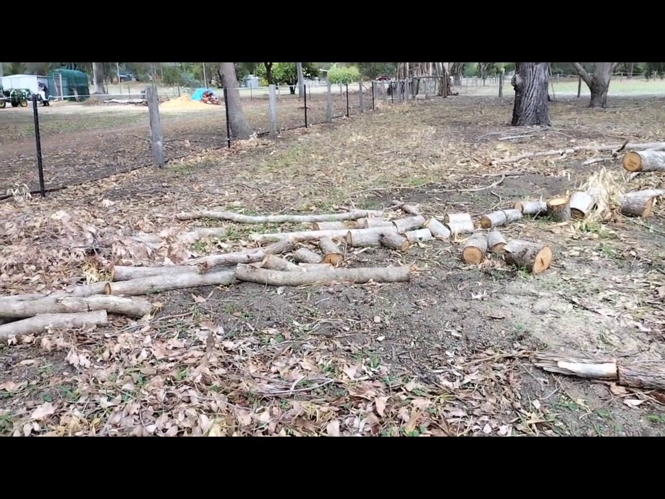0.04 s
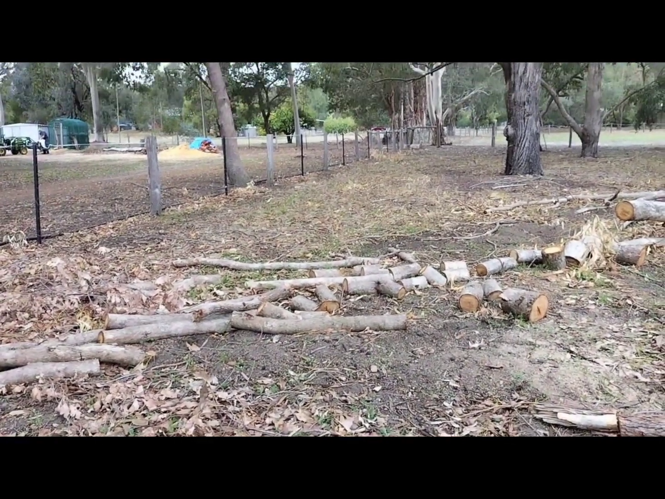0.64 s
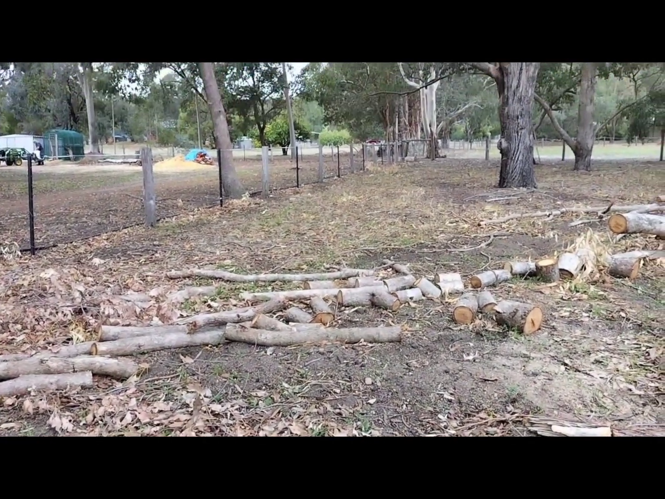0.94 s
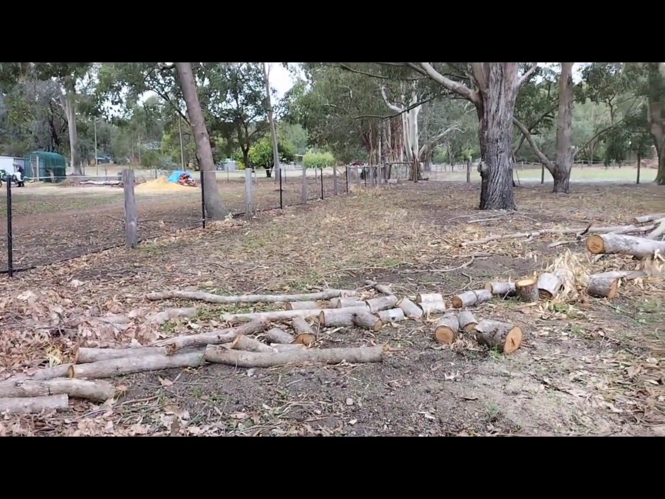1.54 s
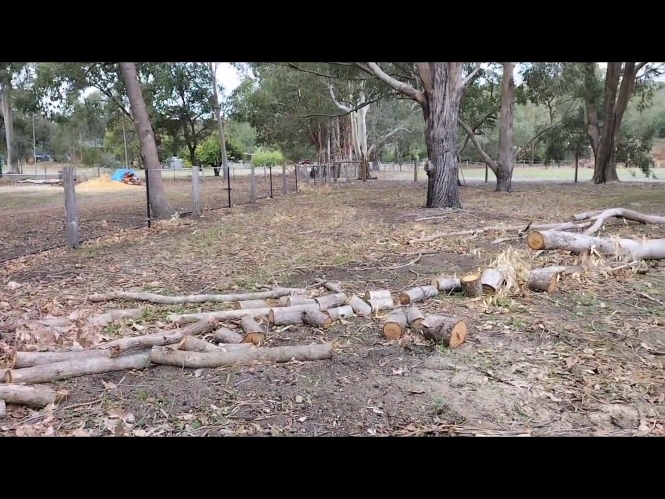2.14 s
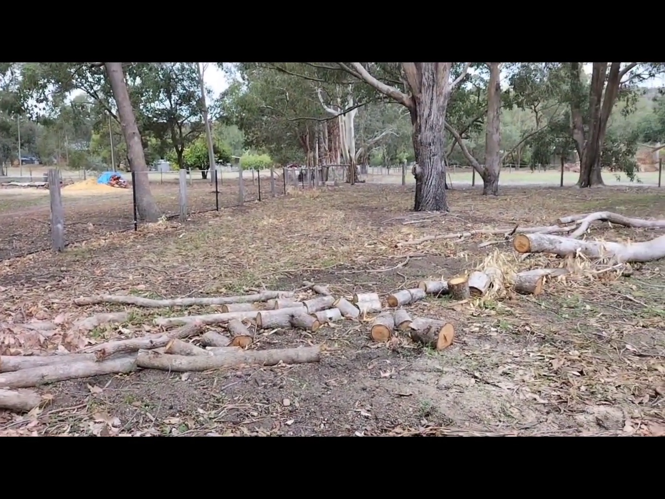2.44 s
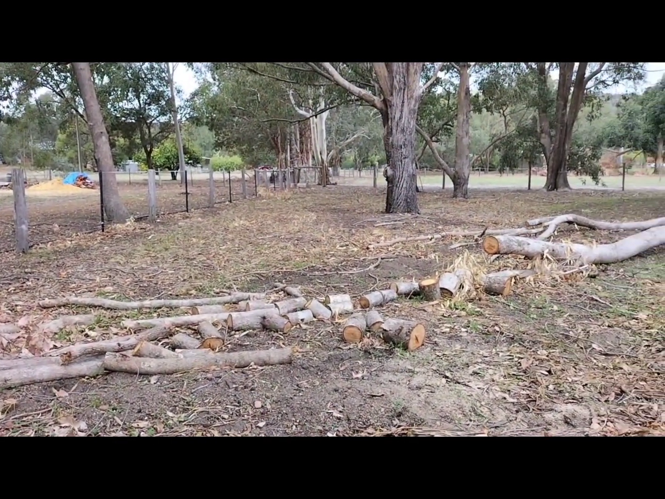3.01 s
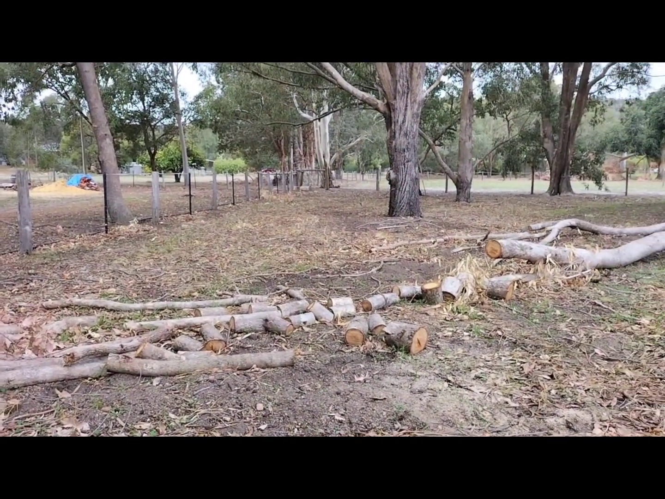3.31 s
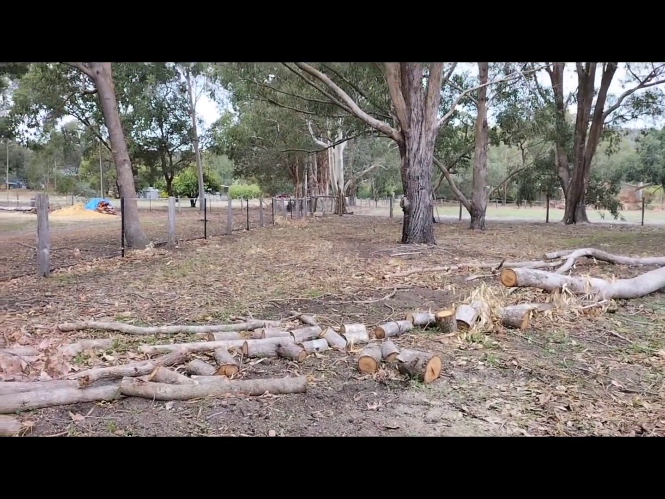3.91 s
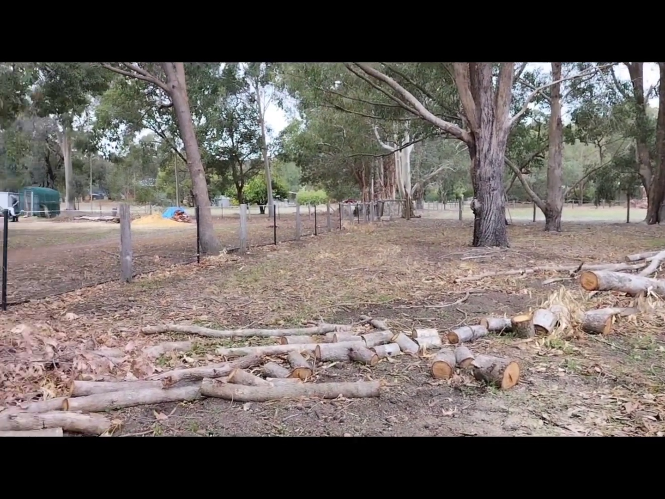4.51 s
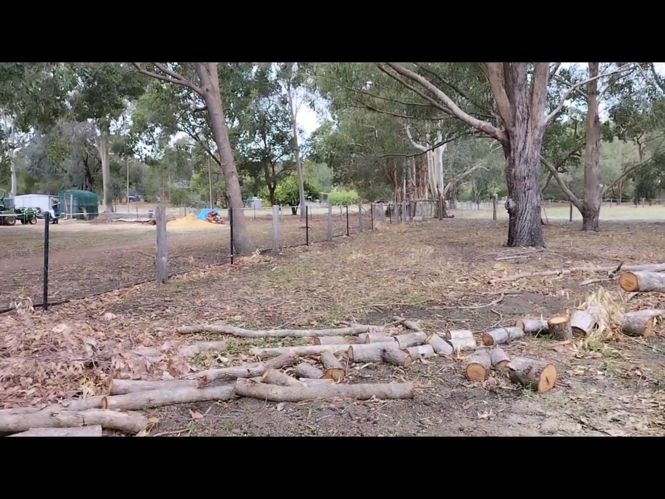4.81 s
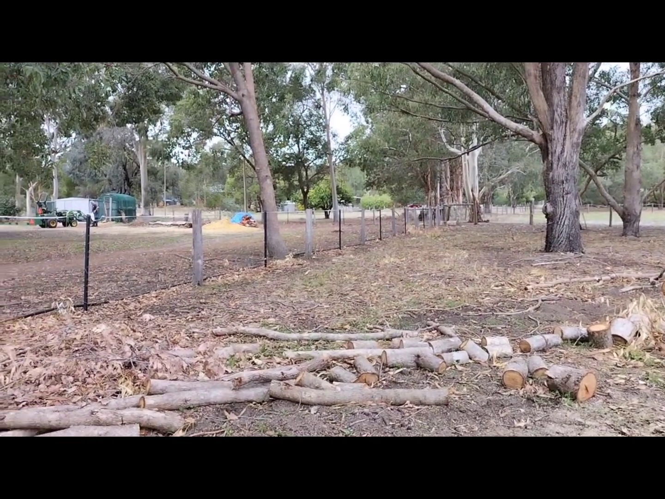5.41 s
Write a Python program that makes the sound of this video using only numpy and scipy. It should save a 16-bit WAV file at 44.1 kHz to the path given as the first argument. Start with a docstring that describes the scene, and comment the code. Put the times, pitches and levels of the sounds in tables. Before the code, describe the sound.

A two-stroke chainsaw idles unevenly close by outdoors, with two brief wooden knocks, then grows quieter and duller.

```python
"""An open paddock: a two-stroke chainsaw idles close by, then is carried off, quieter and duller.
It fires in short runs with a few dead turns between. Each firing barks through the muffler, pumped
gas thumps on every turn, the air box booms at first and the mechanism clatters throughout.
Early on something scrapes, knocks twice and slides with a hiss. Trunks and a fence echo faintly."""
import sys
import numpy as np
from scipy import signal
from scipy.fft import rfft, irfft
from scipy.io import wavfile

SR = 44100
rng = np.random.default_rng(int(sys.argv[2]) if len(sys.argv) > 2 else 0)


def unload_audio(sound):
    """Save the sound as a 16-bit wav file, at the path given as the first command line argument."""
    columns = np.transpose(np.atleast_2d(sound))
    # keep every value between -1 and 1, then stretch to whole-number steps
    steps = np.round(np.clip(columns, -1, 1) * 32767)
    wavfile.write(sys.argv[1], SR, steps.astype(np.int16))


N = 244755
T = np.arange(N) / SR

# crankshaft idle speed (time [s], speed [turns/s])
CRANK_HZ = [(0, 65), (1.3, 62.5), (1.9, 65), (2.3, 61.5), (4.7, 58), (5.2, 62)]
# saw loudness as it is moved (time [s], level [dB])
SAW_DB = [(0, -23), (.75, -22), (1.17, -24), (1.27, -29.5), (1.42, -23), (1.78, -23), (2.25, -29),
          (2.95, -30.5), (3.8, -32), (3.85, -40.5), (4.45, -41), (4.95, -38.5), (5.5, -42.5)]
# muffler turned away (time [s], share [0-1])
MUFFLER_AWAY = [(0, 0.2), (1.9, 0.06), (2.3, 0.64), (4, 0.84), (5.5, 0.57)]
# air box facing the microphone (time [s], share [0-1])
AIRBOX_FACING = [(0, 0.95), (.4, .98), (.65, 0.83), (.9, 0.6), (1.3, 0.55), (1.65, 0.18)]


def from_db(db):
    """Decibels to gain."""
    return 10 ** (np.asarray(db) / 20)


def unit_rms(x):
    """Scale to rms 1."""
    return x / np.sqrt(np.mean(x ** 2) + 1e-20)


def curve(rows, times_s, column=1):
    """Table column, interpolated linearly in time."""
    rows = np.array(rows)
    return np.interp(times_s, rows[:, 0], rows[:, column])


def response(spectrum, size=4096):
    """Minimum-phase, unit-energy impulse response from (frequency [Hz], level [dB]) rows."""
    hz, db = np.transpose(spectrum)
    grid_hz = np.maximum(np.arange(size // 2 + 1) * SR / size, 1)
    magnitude = from_db(np.interp(np.log(grid_hz), np.log(hz), db))
    cepstrum = irfft(np.log(magnitude))
    cepstrum[1:size // 2] *= 2
    cepstrum[size // 2 + 1:] = 0
    h = irfft(np.exp(rfft(cepstrum)))
    return h / np.sqrt(np.sum(h ** 2))


def colour(x, spectrum):
    """Filter by a spectrum."""
    return signal.fftconvolve(x, response(spectrum))[:N]


def noise(spectrum):
    """Coloured noise, rms 1."""
    return unit_rms(colour(rng.standard_normal(N), spectrum))


def pulses(times_s, rms_db):
    """Impulses, each with one crank turn's energy at the given level."""
    sizes = from_db(rms_db) * np.sqrt(SR / curve(CRANK_HZ, times_s))
    samples = np.clip(np.round(times_s * SR).astype(int), 0, N)
    return np.bincount(samples, sizes, N + 1)[:N]


def scatter(times_s, spread):
    """Gaussian offset per stroke."""
    return spread * rng.standard_normal(len(times_s))


def puffs(train, decay_s):
    """Each impulse becomes a dying burst of turbulence of equal energy."""
    pole = np.exp(-2 / (decay_s * SR))
    power = signal.lfilter([1 - pole], [1, -pole], train ** 2)
    return np.sqrt(power + 1e-18) * rng.standard_normal(N)


def radiated_db(times_s, base_db, facing_db, away_db):
    """Level of one saw part: follows the saw's loudness and how it is held."""
    held_db = facing_db * curve(AIRBOX_FACING, times_s) + away_db * curve(MUFFLER_AWAY, times_s)
    return curve(SAW_DB, times_s) + base_db + held_db


def open_air(rms_db=-49.5):
    """Steady low background rush."""
    # air spectrum (frequency [Hz], level [dB])
    spectrum = [(20, -36), (35, -24), (56, -2), (130, -1), (400, -8), (1000, -20), (2000, -38), (3000, -43),
                (7000, -62), (15000, -66)]
    return from_db(rms_db) * noise(spectrum)


def paddock(x, lowpass_hz=2500, decay_s=.08, tail_db=-21):
    """Dull echoes and faint scatter from the trees."""
    # trunk and fence echoes (delay [s], gain [dB])
    echoes = [(0.045, -25), (0.086, -35.5), (0.131, -27.5)]
    t = T[:SR // 2]
    h = rng.standard_normal(len(t)) * np.exp(-t / decay_s) * (t > .006)
    h *= from_db(tail_db) / np.sqrt(np.sum(h ** 2))
    for delay_s, db in echoes:
        h[round(delay_s * SR)] += from_db(db)
    reflected = signal.fftconvolve(x, h)[:N]
    return signal.sosfilt(signal.butter(1, lowpass_hz, fs=SR, output="sos"), reflected)


def scrapes(gain_db=2.5, attack_s=.0071, release_s=.0065):
    """Rough rubs that swell or hold, then catch and stop short."""
    # rubs (start [s], end [s], relative end level [dB], swell [dB])
    rubs = [(1.161, 1.217, -17.5, 10), (1.438, 1.499, -25, 3.5), (1.546, 1.584, -28.5, -0.5)]
    # rub spectrum (frequency [Hz], level [dB])
    spectrum = [(50, -16), (140, 5), (260, 11.5), (450, 5), (1000, 1.5), (1800, -7.5), (2800, -5.5),
                (4000, -16), (5500, -30), (8000, -63.5), (15000, -67.5)]
    envelope = np.zeros(N)
    for start_s, end_s, db, swell_db in rubs:
        gate = np.exp(np.minimum(T - start_s, 0) / attack_s - np.maximum(T - end_s, 0) / release_s)
        envelope += gate * from_db(db + gain_db + np.interp(T, [start_s, end_s], [-swell_db, 0]))
    return envelope * noise(spectrum)


def slide(centre_s=1.379, sigma_s=.068, level_db=-36.5):
    """Smooth hissing slide between the knocks."""
    # slide spectrum (frequency [Hz], level [dB])
    spectrum = [(1060, -31), (1800, -6), (2290, -22), (2370, -12), (2760, 1.5), (3120, -11.5), (3630, -11),
                (3950, -18.5), (4950, -6), (5960, -21.5), (7750, -46), (13100, -120)]
    envelope = from_db(level_db) * np.exp(-((T - centre_s) / sigma_s) ** 2 / 2)
    return envelope * noise(spectrum)


def knocks():
    """Two clusters of dead, woody blows, the second duller."""
    # contacts (time [s], peak [dB], low-pass corner [Hz])
    contacts = [(1.2108, -7.5, 3500), (1.2121, -1, 4000), (1.216, -7, 1500), (1.2272, -1, 3200),
                (1.242, -13, 2000), (1.5471, -10, 970), (1.55, -4.5, 900), (1.5565, -5.5, 690),
                (1.575, -6, 900), (1.5791, -7.5, 800)]
    # struck wood spectrum (frequency [Hz], level [dB])
    spectrum = [(40, -31.5), (100, -3.5), (170, 6), (260, 5.5), (400, 2), (600, -1.5), (1000, 8),
                (1800, -1), (3000, -5), (4500, -18.5), (6500, -35.5), (9000, -38), (15000, -45.5)]
    out, wood = np.zeros(N), response(spectrum)
    for at_s, peak_db, corner_hz in contacts:
        blow = signal.sosfilt(signal.butter(2, corner_hz, fs=SR, output="sos"), wood)
        start = round(at_s * SR) - np.argmax(blow)
        out[start:start + len(blow)] += from_db(peak_db) * blow / blow.max()
    return out


def strokes(jitter_s=.0002, late_s=.0008, surge_turns=5, doubling_db=-2.5):
    """Firings and dead turns, each (time [s], level [dB], edge [dB], place [0-1], surge [-1..1])."""
    # runs of one firing per turn, dead turns between (start [s], firings [count])
    runs = [(.005, 4), (0.1114, 4), (0.2041, 4), (0.3118, 2), (0.386, 5), (0.494, 4), (0.5842, 4),
            (0.6922, 3), (.7686, 4), (0.8608, 4), (0.9557, 9), (1.1144, 8), (1.261, 2), (1.3254, 4),
            (1.4234, 3), (1.52, 9), (1.6791, 4), (1.7723, 3), (1.8318, 5), (1.9542, 2), (2.0119, 7),
            (2.1644, 13), (2.4085, 3), (2.489, 3), (2.5687, 3), (2.6486, 5), (2.7616, 3), (2.845, 4),
            (2.9277, 2), (2.9776, 2), (3.0427, 3), (3.1224, 3), (3.2046, 3), (3.2823, 12), (3.5161, 3),
            (3.6004, 9), (3.7677, 3), (3.852, 6), (3.9694, 3), (4.038, 1), (4.0722, 5), (4.1923, 3),
            (4.2749, 7), (4.4279, 3), (4.4936, 4), (4.598, 17), (4.9237, 2), (4.9903, 4), (5.0907, 3),
            (5.1729, 3), (5.2506, 9), (5.4269, 8)]
    last_s = runs[-1][0] + (runs[-1][1] + 1) / CRANK_HZ[-1][1]
    ends_s = [run[0] for run in runs[1:]] + [last_s]
    fired, dead = [], []
    for (start_s, firings), end_s in zip(runs, ends_s):
        turns = round((end_s - start_s) * curve(CRANK_HZ, start_s))
        firings = int(np.clip(firings, 1, turns))
        turn = np.arange(turns)
        fires = turn < firings
        # progress through the run or the gap
        place = np.where(fires, turn / max(firings - 1, 1), (turn - firings + 1) / (turns - firings + 1))
        lag_s = late_s * np.where(fires, place, 1 - place)  # firings fall behind, dead turns catch up
        at_s = start_s + (end_s - start_s) * turn / turns + lag_s
        edge_db = radiated_db(at_s, base_db=-17, facing_db=13.5, away_db=1.5)
        edge_db += doubling_db * np.log2(max(firings / 3, 1))  # long runs are softer-edged
        surge = np.cos(2 * np.pi * (turn - 1) / surge_turns)  # combustion peaks on the second firing
        rows = np.transpose([at_s, curve(SAW_DB, at_s), edge_db, place, surge])
        fired += list(rows[fires])
        dead += list(rows[~fires])
    fired, dead = np.array(fired).T, np.array(dead).T
    fired[0] += scatter(fired[0], jitter_s)
    return fired, dead


def loose_metal(x, modes, wander_db=3.5, knots=34):
    """Narrow resonances, each swelling and fading on its own."""
    out = np.zeros(N)
    for hz, width_hz, db in modes:
        band = signal.butter(2, [hz - width_hz / 2, hz + width_hz / 2], "band", fs=SR, output="sos")
        wander = np.interp(T, np.linspace(0, T[-1], knots), rng.standard_normal(knots))
        out += from_db(db) * unit_rms(signal.sosfilt(band, x) * from_db(wander_db * wander))
    return out


def mechanism(fired, dead, slap_lead_s=.0038, cover_db=-7, clutch_db=-5.5):
    """Piston slap and firing shocks jolt the casing; cover and clutch ring over the fan's rush."""
    # casing and fan spectra (frequency [Hz], level [dB])
    casing_spectrum = [(150, -19), (500, 6.5), (1000, 3), (1500, -7), (1950, -11.5), (2300, 0), (2600, 0),
                       (2780, -4.5), (3050, -12), (3500, -25.5), (4200, -45), (6000, -44), (8000, -60.5)]
    fan_spectrum = [(1500, -19), (3300, 0), (3900, -9), (4400, -1), (4750, 0), (4980, -3.5), (5300, -14),
                    (6100, -16.5), (7000, -28), (8000, -56.5), (12000, -38.5), (15500, -34)]
    # metal resonances (frequency [Hz], width [Hz], level [dB])
    cover_modes = [(2428, 64, -11.5), (2570, 240, -15.5), (2775, 86, -5.5), (2930, 48, -11),
                   (3060, 40, -19), (3310, 26, -18)]
    clutch_modes = [(4060, 77, -13), (5020, 62, -18), (4850, 37, -4), (5070, 74, -5)]
    # slow level drift (time [s], clatter [dB], hiss [dB])
    drift = [(0, -2.5, -1.5), (.6, 0.5, 3.5), (1.1, 1, 0), (2.2, -4, -3.5), (2.7, 2, -4), (3.7, -0.5, -1),
             (4.7, 0.5, -1), (5.2, 0.5, 4.5)]
    turns_s = np.sort(np.concatenate([fired[0], dead[0]]))
    slaps = pulses(turns_s - slap_lead_s, -7 + scatter(turns_s, 3.5))
    shocks = pulses(fired[0], -7.5 - scatter(fired[0], 1))
    rattle = puffs(slaps + shocks, decay_s=.0015) + from_db(-1) * rng.standard_normal(N)
    rush = puffs(slaps + shocks, decay_s=.0018) + from_db(-5) * rng.standard_normal(N)
    away = curve(MUFFLER_AWAY, T)
    side_db = 2.5 * (away - .5)  # clutch side comes round as the muffler turns away
    clatter = from_db(2) * unit_rms(colour(rattle, casing_spectrum))
    clatter += from_db(cover_db + side_db) * loose_metal(rush, cover_modes)
    hiss = from_db(.5 - 4 * away) * unit_rms(colour(rush, fan_spectrum))
    hiss += from_db(clutch_db + side_db) * loose_metal(rattle, clutch_modes)
    clatter_db = radiated_db(T, base_db=-18.5, facing_db=11.5, away_db=-4) + curve(drift, T)
    hiss_db = radiated_db(T, base_db=-36, facing_db=17, away_db=-4) + curve(drift, T, column=2)
    return clatter * from_db(clatter_db) + hiss * from_db(hiss_db)


def shake(fired, dead, fired_db=-52.5, dead_db=-48):
    """Deep shake on every turn, carrying evenly all round."""
    # shake spectrum (frequency [Hz], level [dB])
    spectrum = [(20, -36), (40, -21), (62, -7.5), (90, -2), (125, 1.5), (170, -5.5), (300, -22.5),
                (1500, -59.5), (8000, -100.5)]
    jolts = pulses(fired[0] + .00087, fired_db) + pulses(dead[0] + .0035, dead_db)
    return colour(jolts, spectrum)


def gas_thud(fired, dead, lead_s=.0021, jitter_s=.00022, churn_db=-9.5, surge_db=3.5):
    """Gas pumped on every turn thumps, just ahead of the exhaust."""
    # thud spectra, firing and dead turn (frequency [Hz], level [dB])
    fired_spectrum = [(40, -38.5), (100, -17.5), (140, -3.5), (185, 1.5), (235, -1.5), (300, -15.5),
                      (450, -20.5), (1500, -62.5), (8000, -96.5)]
    dead_spectrum = [(40, -30.5), (110, -8.5), (150, -11.5), (200, -3.5), (245, 2), (310, -5.5), (450, -19),
                     (1500, -58), (8000, -92.5)]
    radiation = dict(base_db=-8, facing_db=-4.5, away_db=5)
    fired_s, _, _, _, surge = fired
    at_s = fired_s - lead_s + scatter(fired_s, jitter_s)
    pumped = pulses(at_s, radiated_db(at_s, **radiation) + surge_db * surge + scatter(at_s, 1))
    churn = from_db(churn_db) * puffs(pumped, decay_s=.004)
    dead_s = dead[0] - .0008
    unfired = pulses(dead_s, radiated_db(dead_s, **radiation) - 1 + scatter(dead_s, 1.5))
    return colour(pumped + churn, fired_spectrum) + colour(unfired, dead_spectrum)


def airbox(fired, dead, run_hz=370, climb_hz=42, gap_hz=362, sink_hz=62, throb=.76, lag_s=.0028):
    """Hollow tone swelling on every turn; pitch climbs through a run, sinks over dead turns."""
    climbing = [(s + lag_s, run_hz + climb_hz * place) for s, place in zip(fired[0], fired[3])]
    sinking = [(s + lag_s, gap_hz - sink_hz * place) for s, place in zip(dead[0], dead[3])]
    pitch = np.array(sorted(climbing + sinking))
    crank_rad = 2 * np.pi * np.interp(T - lag_s, pitch[:, 0], np.arange(len(pitch)))
    tone = np.sin(2 * np.pi * np.cumsum(curve(pitch, T)) / SR)
    boom = unit_rms(tone * (1 + throb * np.cos(crank_rad)))
    return boom * from_db(radiated_db(T, base_db=-33, facing_db=37.5, away_db=0))


def exhaust(fired, dead, build_db=2, edge_build_db=2.5, surge_db=1.5, crack_db=-4, coast_db=-7):
    """Each firing barks through the muffler, harder as a run goes on; a dead turn only puffs."""
    # muffler spectra, facing and turned away (frequency [Hz], level [dB])
    bark_spectrum = [(120, -32.5), (200, -8.5), (295, -3.5), (375, -0.5), (440, -6), (510, 1), (590, 6.5),
                     (650, -0.5), (720, 2.5), (820, -3.5), (950, -18), (1400, -36.5), (3000, -53.5),
                     (9000, -100)]
    away_spectrum = [(120, -22), (200, -6), (295, -4), (375, 7), (425, -1.5), (480, 5.5), (580, -0.5),
                     (640, -1.5), (710, 2.5), (800, -7.5), (950, -10.5), (1400, -35.5), (3000, -66),
                     (9000, -95.5)]
    # spectra of firing edge, crack and dead-turn puff (frequency [Hz], level [dB])
    edge_spectrum = [(300, -36.5), (650, -9.5), (850, 15.5), (1030, 12.5), (1160, 4), (1280, 2),
                     (1500, -19.5), (1950, -17), (2600, -16), (3600, -26), (8000, -65.5)]
    crack_spectrum = [(600, -13.5), (1300, 1.5), (1900, -6.5), (2400, 3.5), (2900, 2), (3600, -20.5),
                      (4700, -15.5), (5600, -28.5), (8000, -58.5)]
    coast_spectrum = [(100, -39.5), (240, -4.5), (380, -4.5), (500, 4), (600, -4), (720, -6), (900, -23),
                      (1300, -35), (2500, -46.5), (8000, -74.5)]
    at_s, level_db, edge_db, place, surge = fired
    force_db = scatter(at_s, .6)
    blows = pulses(at_s - .0006, level_db + force_db + build_db * (place - .5))
    away = curve(MUFFLER_AWAY, T)
    bark = colour(blows * (1 - away), bark_spectrum) + colour(blows * away, away_spectrum)
    edge_s = at_s - .0004
    sharp_db = edge_db + surge_db * surge + 2 * force_db + edge_build_db * (place - .5)
    edge = colour(pulses(edge_s, sharp_db - .5), edge_spectrum)
    tear = pulses(edge_s, sharp_db + .54 * (edge_db + 30))  # the sharpest firings crack most
    crack = from_db(crack_db) * colour(puffs(tear, decay_s=.003), crack_spectrum)
    dead_s, dead_db = dead[:2]
    puff_db = dead_db + coast_db - 3 * curve(AIRBOX_FACING, dead_s) + scatter(dead_s, 4)
    coast = colour(pulses(dead_s, puff_db), coast_spectrum)
    return coast - bark - edge + crack


def scene():
    """Saw, knocks, scrapes and slide in the open air; mono."""
    fired, dead = strokes()
    saw = sum(part(fired, dead) for part in (exhaust, gas_thud, shake, airbox, mechanism))
    direct = saw + knocks() + scrapes() + slide()
    return (direct + paddock(direct) + open_air())[None]


def record(dry, low_cut_hz=45, high_cut_hz=15650):
    """Microphone: bass cut, rounded peaks, steep top cut."""
    thin = signal.sosfilt(signal.butter(2, low_cut_hz, "high", fs=SR, output="sos"), dry)
    rounded = thin / (1 + thin ** 6) ** (1 / 6)
    return signal.sosfilt(signal.ellip(10, .1, 80, high_cut_hz, fs=SR, output="sos"), rounded)


dry = scene()
out = record(dry)
unload_audio(out)
```